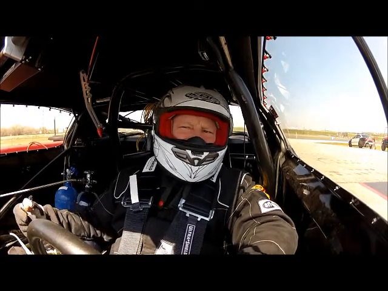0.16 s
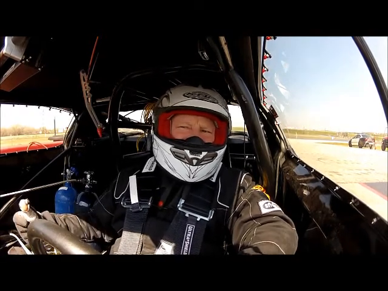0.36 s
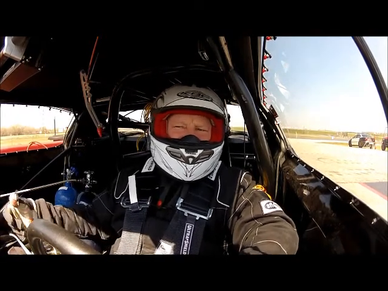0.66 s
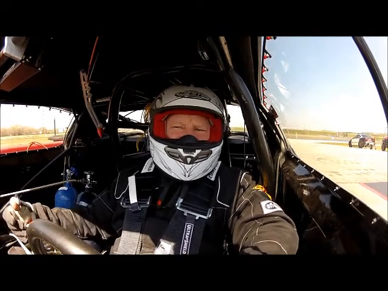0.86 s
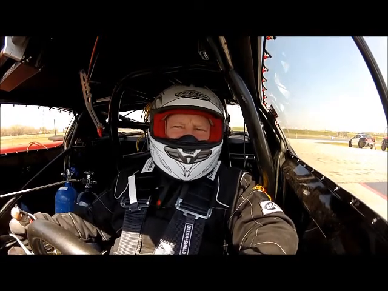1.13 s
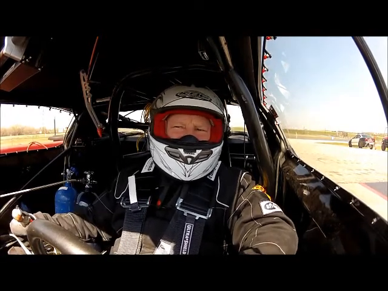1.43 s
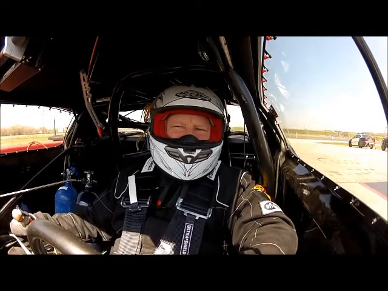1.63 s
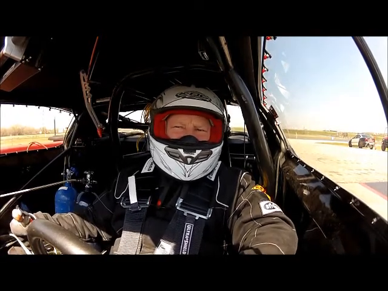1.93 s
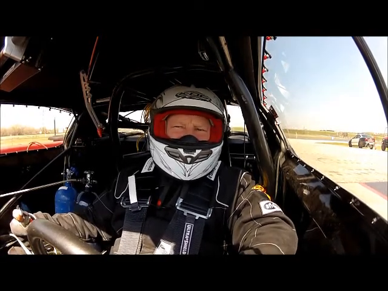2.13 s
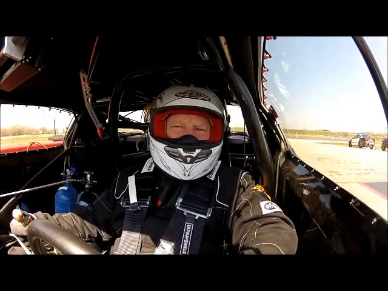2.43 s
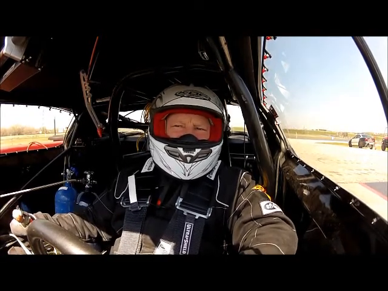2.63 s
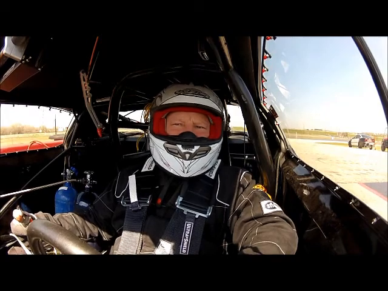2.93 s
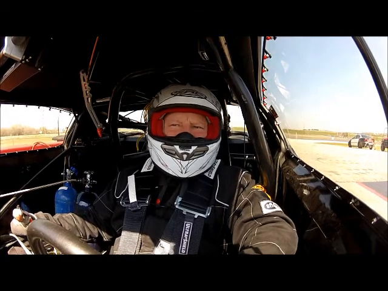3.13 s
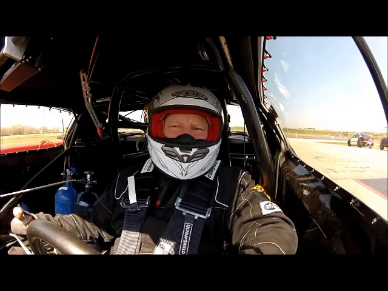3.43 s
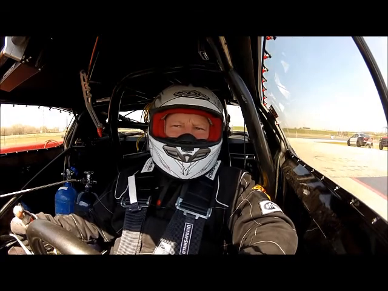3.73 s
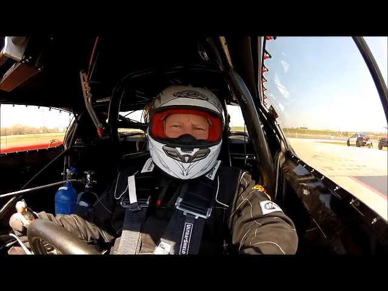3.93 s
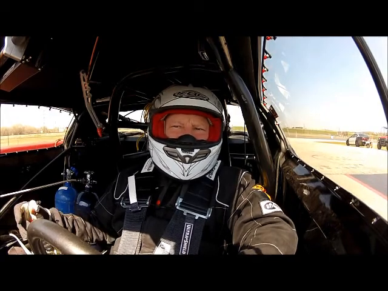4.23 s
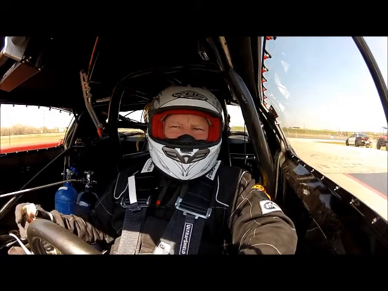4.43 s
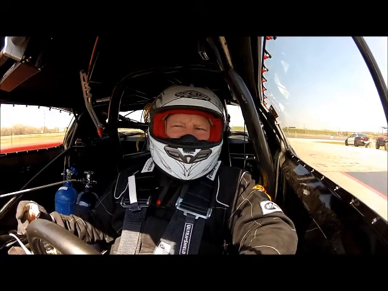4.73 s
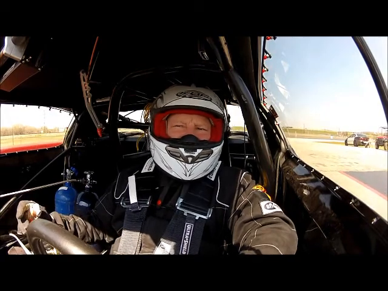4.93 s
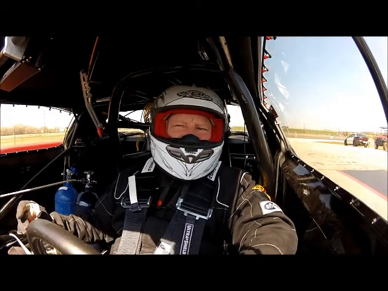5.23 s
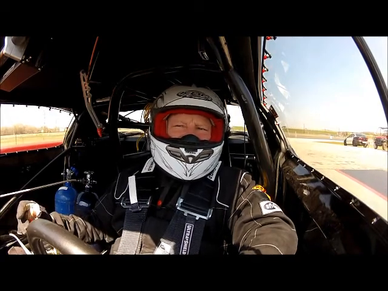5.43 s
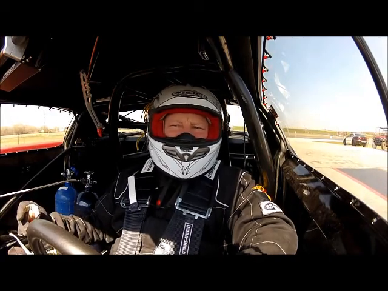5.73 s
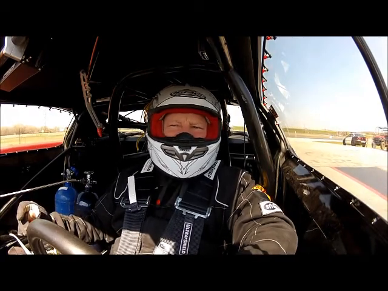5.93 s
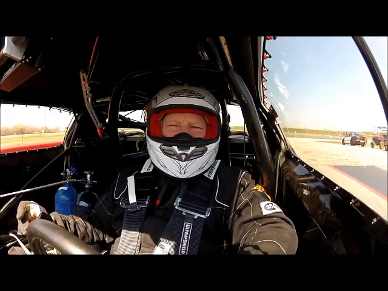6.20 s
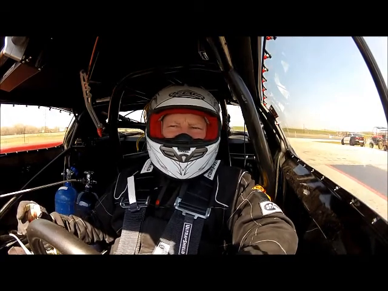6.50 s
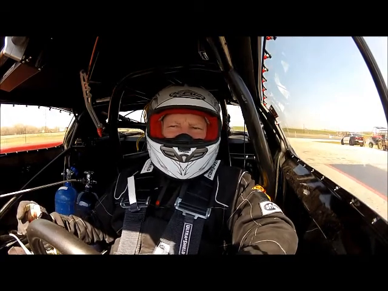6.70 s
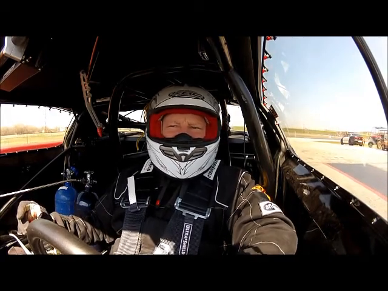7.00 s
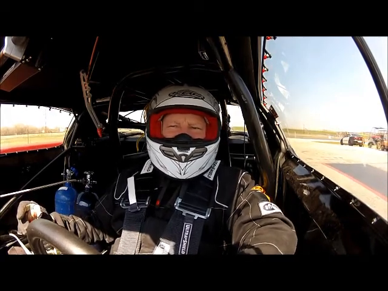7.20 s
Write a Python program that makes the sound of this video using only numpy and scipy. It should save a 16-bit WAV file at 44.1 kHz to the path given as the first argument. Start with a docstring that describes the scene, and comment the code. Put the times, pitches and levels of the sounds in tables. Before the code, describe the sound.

A loud, lumpy race engine idles from inside the cabin, booming and clattering, stumbling, revving slightly, sagging, then settling, over a thin pump whine.

```python
"""Inside the bare cabin of a drag car, heard through a small camera that samples at 12 kHz: a V8 idles.
Exhaust tones boom on the cabin's air over a floor rumble of firing pulses and gas noise; filtered noise makes
panels clatter, rockers tick and knocks ring, while a sine whines for the fuel pump. The engine stumbles twice,
the driveline shudders in noise blows, then the idle rises for three seconds, sags and settles.
Overloads make the limiter duck, and the coarse sampling adds a metallic fizz."""
import sys
import numpy as np
from scipy import signal
from scipy.fft import rfft, irfft, next_fast_len
from scipy.io import wavfile
from scipy.ndimage import uniform_filter1d, minimum_filter1d, map_coordinates

SR = 44100
rng = np.random.default_rng(int(sys.argv[2]) if len(sys.argv) > 2 else 0)


def int16_out(signal):
    """Quantize to a 16-bit WAV file."""
    q = np.round(np.clip(np.atleast_2d(signal).T, -1, 1) * 32767)
    wavfile.write(sys.argv[1], SR, q.astype(np.int16))


N = 324576
TIME = np.arange(N) / SR

# broad response of the sheet metal: (freq_hz, relative level_db per Hz)
SHEET_METAL = [(400, -26.5), (850, -30.5), (1070, -7.5), (1450, -6.5), (1580, 0.5), (1640, -70),
               (1800, -10), (1930, -19), (2020, -4), (2350, -4.5), (2520, -14), (3100, -18), (4200, -21.5),
               (6500, -37)]
# panel resonances: (freq_hz, width_hz, relative level_db)
PANEL_MODES = [(1044, 14, -9), (1203.5, 19.5, 0), (1494, 23, -5), (1548, 26, -0.5), (1737, 61, -10),
               (2000, 27, -5), (2110, 38.6, 2.5), (2342, 28.5, 3.5), (2813, 14, -8), (3235, 42, -12.5),
               (3846, 65, -11.5)]


def from_db(db):
    """Decibels to an amplitude factor."""
    return 10 ** (np.asarray(db) / 20)


def rms_one(x):
    """Scale to an rms of 1."""
    return x / np.sqrt(np.mean(np.abs(x) ** 2) + 1e-20)


def in_time(rows):
    """Each column of a curve, sample by sample."""
    s, *columns = np.transpose(rows)
    return [np.interp(TIME, s, c) for c in columns]


def at_hz(points, hz):
    """A spectrum's dB at any frequency, along a logarithmic frequency axis."""
    f, db = np.transpose(points)
    return np.interp(np.log(hz + 1e-9), np.log(f), db)


def drift(rate):
    """Smooth random wandering of rms 1, with rate random knots a second."""
    knots = rng.standard_normal(8192)
    return rms_one(map_coordinates(knots, [TIME * rate], order=3, mode="wrap"))


def body(x, spectrum, modes=()):
    """Ring x through a broad response with resonances on top: minimum phase, unit gain for white noise."""
    size = next_fast_len(N + SR // 2) * 2
    hz = np.arange(size // 2 + 1) * SR / size
    top_rolloff = 1 + (hz / spectrum[-1][0]) ** 16
    power = from_db(at_hz(spectrum, hz)) ** 2 / top_rolloff
    for centre, width, db in modes:
        power = power + from_db(db) ** 2 / (1 + ((hz - centre) / width) ** 2) ** 2
    # folding the cepstrum onto positive time makes the phase minimum
    cepstrum = irfft(np.log(power / power.mean() + 1e-14) / 2)
    cepstrum[1:size // 2] *= 2
    cepstrum[size // 2 + 1:] = 0
    return irfft(rfft(x, size) * np.exp(rfft(cepstrum)))[:N]


def strokes(crank, count, fade, uneven_db, jitter):
    """Envelope of count uneven blows a cycle; fade and jitter are shares of the gap between blows; rms 1."""
    turn = (crank + 1) * count + jitter * drift(90)
    strength = from_db(uneven_db * np.clip(rng.standard_normal(4096), -2, 2))
    return rms_one(strength[turn.astype(int)] * np.exp(-(turn % 1) / fade))


def boom(crank, rpm, waver=.05, lope=.4, even_s=0.055):
    """The exhaust tone favoured by the cabin's resonance leads; uneven burning unsettles the side tones; rms 1."""
    # exhaust tones: (multiple of the four-stroke cycle rate, level_db); the eighth is the firing note
    exhaust_orders = [(4, -21), (5, -18), (6, -15.5), (7, -13), (8, 1.5), (9, -6), (10, -12.5), (11, -15.5),
                      (12, -11)]
    # the cabin's air resonance: (freq_hz, gain_db)
    cabin_air = [(25, -41), (45, -29), (58, -2), (68, 9), (80, -1), (92, -13), (125, -22)]
    tones = 0
    for order, db in exhaust_orders:
        order = round(order)
        gain = from_db(db + at_hz(cabin_air, order * rpm / 120))
        depth = waver if order == 8 else lope
        unsteady = depth * (drift(11) + 1j * drift(7.7))
        phase = 2j * np.pi * (order * crank + rng.random())
        tones = tones + gain * (1 + unsteady) * np.exp(phase)
    # level out the slow swings; the boom's level is set in scene()
    power = uniform_filter1d(np.abs(tones) ** 2, round(even_s * SR)) / 2
    return tones.real / np.sqrt(power)


def rumble(crank, gas_db=5.5, uneven_db=3.5):
    """Each firing sends a pressure pulse and a puff of turbulent gas down the pipes; rms 1."""
    # exhaust rumble through the floor: (freq_hz, relative level_db per Hz)
    floor_response = [(22, -29), (45, -2), (100, 2.5), (130, -3), (180, -2.5), (235, 2), (345, -1.5),
                      (400, -13.5), (480, -17), (535, -6), (610, -6), (690, -23), (900, -24), (1500, -60)]
    firings = np.diff(np.floor(crank * 8), prepend=np.floor(crank[0] * 8))
    pulses = rms_one(firings * from_db(uneven_db * rng.standard_normal(N)))
    gas = rng.standard_normal(N) * strokes(crank, count=8, fade=1.0, uneven_db=0.0, jitter=0.036)
    return rms_one(body(pulses + from_db(gas_db) * gas, floor_response))


def clatter(crank, rpm, wash=1.0, chug_rpm=1000, rockers_db=-16):
    """Loose panels rattle on every firing, hardest round the strongest cylinder, and chug more at speed; rockers tick."""
    # clatter through one cycle, cylinder by cylinder: level_db at chug_rpm
    cylinder_levels = [3.5, 2, 1, -2, 3, 2, 1.5, 3]
    # broad response of the ticking rockers: (freq_hz, relative level_db per Hz)
    rocker_response = [(1500, -15.5), (2800, -4), (4200, -31.5), (6500, -6)]
    # rocker resonances: (freq_hz, width_hz, relative level_db)
    rocker_rings = [(3470, 100, -6), (3540, 88, -1.5), (3910, 200, -1)]
    cylinder_at = np.arange(len(cylinder_levels)) / len(cylinder_levels)
    pattern_db = np.interp(crank, cylinder_at, cylinder_levels, period=1)
    lope = from_db(pattern_db * rpm / chug_rpm + 0.96 * drift(25))
    firing = strokes(crank, count=8, fade=1.0, uneven_db=0.6, jitter=.06)
    rattle = strokes(crank, count=24, fade=0.5, uneven_db=1.0, jitter=.25)
    valves = strokes(crank, count=4, fade=0.77, uneven_db=8.0, jitter=0.0093)
    shaking = rng.standard_normal(N) * lope * firing * (wash + rattle)
    panels = body(shaking, SHEET_METAL, PANEL_MODES)
    rockers = body(rng.standard_normal(N) * valves, rocker_response, rocker_rings)
    return rms_one(panels) + from_db(rockers_db) * rms_one(rockers)


def knocks(crank, lead_s=.02, rise_s=0.0016, fall_s=0.0022, buzz_s=0.011, buzz=0.32,
           split_hz=1800, soft_hz=3000, low_db=-10.5):
    """Once a cycle a firing sets a panel buzzing, slams it for a few ms and lets it ring; some hit much harder."""
    # the hard knocks: (start_s at the slam's peak, drive level_db, balance_db of low ring against high)
    hard_knocks = [(.168, 2.5, -6), (.403, -3.5, 3), (.529, -2, -10), (.761, -1.5, -6), (.997, -4.5, -3),
                   (1.352, -2.5, 1), (1.595, -3.5, -12), (1.712, 0.5, 2.5), (2.067, -1.5, 6),
                   (2.302, -3.5, -2), (2.643, -5, -13), (2.777, 0.5, -1), (2.875, -3.5, 2.5),
                   (3.653, -8, 3), (3.834, -8, -5), (4.355, -4, 7), (4.736, -5.5, -10), (5.14, -5, 0),
                   (5.339, -2, 4.5), (5.543, -5, 5), (5.734, -7.5, 4), (6.456, -.5, 5.5),
                   (6.605, -4.5, 5.5), (6.751, 0.5, -7), (6.998, -2.5, 2), (7.175, -7.5, 6), (7.233, -4, 2)]
    usual_db, scatter_db, balance_scatter_db = -10.5, 1, 4
    blows = list(hard_knocks)
    cycles = TIME[1:][np.diff(np.floor(crank)) > 0]
    for s, (a, b) in zip(cycles, rng.standard_normal((len(cycles), 2))):
        # a hard knock close by takes the usual one's place
        if all(abs(s - hard[0]) > lead_s for hard in hard_knocks):
            blows.append((s, usual_db + scatter_db * a, balance_scatter_db * b))

    age = np.arange(SR // 20) / SR - lead_s
    slam = np.exp(-(age / np.where(age < 0, rise_s, fall_s)) ** 2)
    shape = slam + buzz * np.exp(-np.abs(age) / buzz_s)
    high, low = np.zeros(N + SR), np.zeros(N + SR)
    for (s, db, balance_db), grit in zip(blows, rng.choice([-1, 1], (len(blows), len(age)))):
        start = max(round((s - lead_s) * SR), 0)
        high[start:start + len(age)] += from_db(db) * shape * grit
        low[start:start + len(age)] += from_db(db + balance_db) * shape * grit

    deep = signal.sosfilt(signal.butter(5, split_hz, "low", fs=SR, output="sos"), low[:N])
    bright = signal.sosfilt(signal.butter(5, split_hz, "high", fs=SR, output="sos"), high[:N])
    softened = signal.sosfilt(signal.butter(2, soft_hz, fs=SR, output="sos"), bright)
    return body(from_db(low_db) * deep + softened, SHEET_METAL, PANEL_MODES)


def shudder(crank, start_s=2.87, length_s=0.22, attack_s=0.052, release_s=0.055, level_db=-19.3):
    """The driveline chatters in quick uneven blows that shake the floor."""
    # the shudder's broad response: (freq_hz, relative level_db per Hz)
    driveline_response = [(90, -10), (160, 2), (330, 4), (430, -21), (580, -0.5), (800, -29.5), (1400, -9),
                          (1800, -25), (4000, -13), (7000, -59)]
    # the shudder's resonances: (freq_hz, width_hz, relative level_db)
    driveline_rings = [(247, 21, 6.3), (1559, 35.8, 9.3), (1750, 24, 1.8)]
    age = TIME - start_s
    attack = np.clip(age / attack_s, 0, 1)
    release = np.exp(-np.maximum(age - length_s, 0) / release_s)
    blows = rng.standard_normal(N) * strokes(crank, count=12, fade=0.73, uneven_db=2.5, jitter=0.23)
    ringing = rms_one(body(blows, driveline_response, driveline_rings))
    return from_db(level_db) * attack * release * ringing


def pump(note_hz=373.3, wander_hz=0.75):
    """The electric fuel pump holds one nearly steady note, which fades briefly during the shudder."""
    # fuel pump whine: (time_s, rms level_db)
    whine_level = [(0, -32), (2.75, -33), (2.95, -46), (3.4, -34.5), (6.1, -35), (6.5, -32), (7.36, -31)]
    turns = np.cumsum(note_hz + wander_hz * drift(5.03)) / SR
    return from_db(in_time(whine_level)[0]) * np.sqrt(2) * np.sin(2 * np.pi * turns)


def limiter(x, ceiling_db=-0.62, duck_per_db=1.4, release_db_per_s=66, attack_s=0.0017, ahead_s=0.0013):
    """Just ahead of each overload the gain ducks in proportion to the excess, then creeps back."""
    excess_db = np.maximum(20 * np.log10(np.abs(x) + 1e-9) - ceiling_db, 0)
    duck_db = duck_per_db * excess_db
    # a sliding maximum looks ahead of each overload
    duck_db = -minimum_filter1d(-duck_db, 2 * round(ahead_s * SR) + 1)
    recovery_db = release_db_per_s * TIME
    held_db = np.maximum.accumulate(duck_db + recovery_db) - recovery_db
    pole = np.exp(-1 / (attack_s * SR))
    return x * from_db(-signal.lfilter([1 - pole], [1, -pole], held_db))


def sample_and_hold(x, sampler_hz=12000, edge_hz=5720):
    """Slow sampling mirrors the whole sound round the sampling rate; holding each sample weights the mirror images."""
    narrow = signal.sosfilt(signal.ellip(8, .3, 50, edge_hz, fs=SR, output="sos"), x)
    clipped = np.clip(narrow, -.92, .92)
    mirrored = clipped * (1 + 2 * np.cos(2 * np.pi * sampler_hz * TIME))
    hz = np.arange(N + 1) * SR / (2 * N)
    hold = np.sinc(hz / sampler_hz) / np.sinc(hz / SR)
    return irfft(rfft(mirrored, 2 * N) * hold)[:N]


def scene():
    """Engine sounds follow the crank, counted in four-stroke cycles of two turns; the boom shakes the car."""
    # engine speed apart from the stumbles: (time_s, speed_rpm)
    engine_speed = [(0.0, 1018.0), (1.2, 1016), (2.7, 1012), (2.9, 1098), (3.3, 1071), (3.55, 1121),
                    (3.8, 1410), (4.25, 1376), (4.5, 1263), (4.8, 1192), (5.45, 1182.1), (5.7, 1258),
                    (6.16, 1268), (6.42, 832.3), (6.65, 788.7), (6.9, 1007), (7.36, 1017)]
    # cabin boom apart from the stumbles, strongest with the firing note on resonance: (time_s, level_db)
    boom_level = [(0, -7), (2.64, -5.5), (2.88, -21), (3.25, -25), (3.62, -5.5), (3.7, -20), (4.1, -19.5),
                  (4.3, -17.5), (4.95, -15), (5.6, -15), (6.2, -21), (6.33, -6), (6.46, -17), (6.7, -15),
                  (6.8, -20), (6.92, -6), (7.36, -6.5)]
    # the engine stumbles, losing speed and boom: (centre_s, half_length_s)
    stumble_times = [(0.498, .06), (1.543, .04)]
    stumble_sag_rpm, stumble_loss_db = 60, 7
    start_of_cycle = -.424  # cycles
    # rumble and clatter levels at the reference boom level, and the share of the boom's swing they follow
    reference_boom_db, rumble_db, clatter_db = -1, -22.5, -18
    rumble_follows, clatter_follows = 0.23, 0.08

    stumble = sum(np.exp(-((TIME - s) / half_s) ** 2) for s, half_s in stumble_times)
    rpm = in_time(engine_speed)[0] - stumble_sag_rpm * stumble
    crank = start_of_cycle + np.cumsum(rpm / 120) / SR
    boom_db = in_time(boom_level)[0] - stumble_loss_db * stumble
    swing_db = boom_db - reference_boom_db
    booming = from_db(boom_db) * boom(crank, rpm)
    rumbling = from_db(rumble_db + rumble_follows * swing_db) * rumble(crank)
    metal = from_db(clatter_db + clatter_follows * swing_db) * clatter(crank, rpm)
    return (booming + rumbling + metal + knocks(crank) + shudder(crank) + pump())[None]


def record(dry):
    """Limiter, then the coarse sampler that gives the treble its metallic fizz; the top is cut at 15350 Hz."""
    out = sample_and_hold(limiter(dry[0]))
    return signal.sosfiltfilt(signal.ellip(12, .05, 60, 15350, fs=SR, output="sos"), out)[None]


dry = scene()
out = record(dry)
int16_out(out)
```